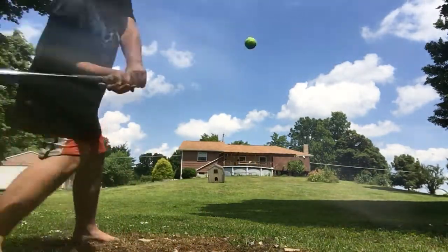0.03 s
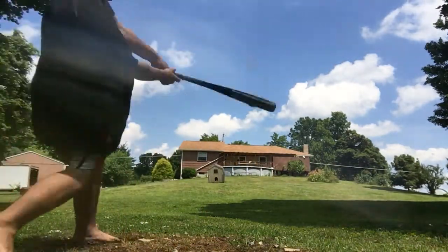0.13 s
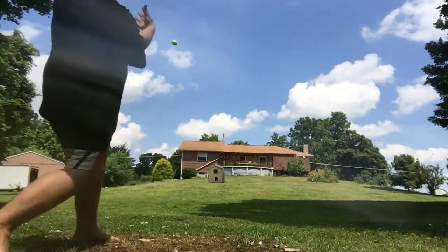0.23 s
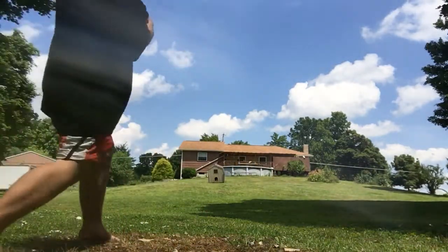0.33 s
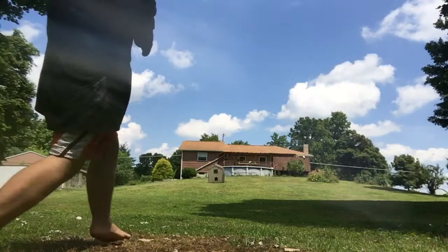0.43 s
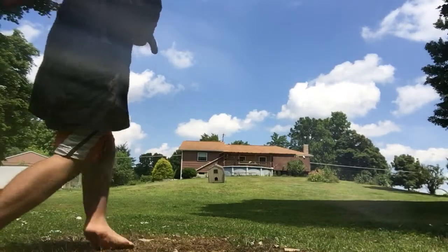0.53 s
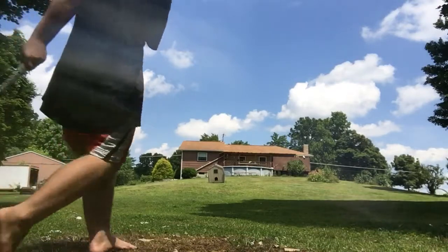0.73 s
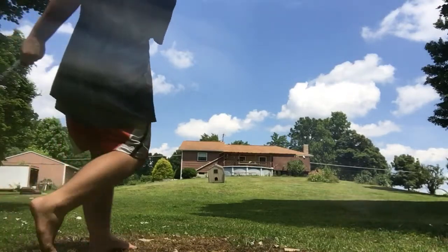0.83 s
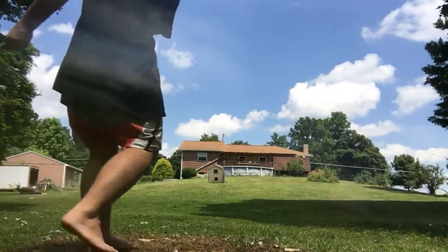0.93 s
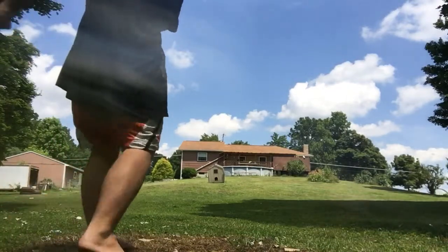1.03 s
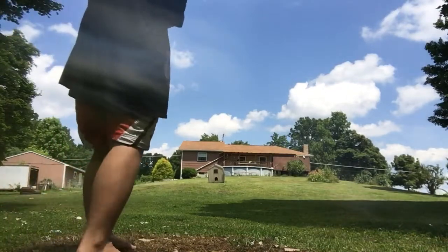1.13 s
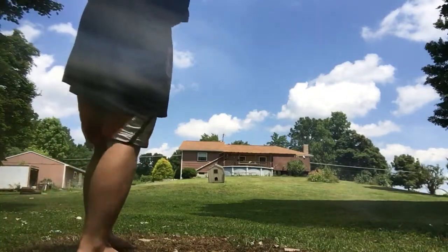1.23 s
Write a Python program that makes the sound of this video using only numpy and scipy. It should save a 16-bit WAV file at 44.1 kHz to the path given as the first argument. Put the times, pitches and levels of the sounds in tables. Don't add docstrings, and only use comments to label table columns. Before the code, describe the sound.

Close, ground-level outdoor pickup of a bat swing: slight rustle and whoosh, a sharp metallic crack with a very short ring and rubbery thump, dull slaps off walls and trees, quiet foot scuffs, and distant chirps.

```python
import sys
import numpy as np
from scipy import signal
from scipy.fft import rfft, irfft
from scipy.io import wavfile
from scipy.ndimage import uniform_filter1d

SR = 44100
rng = np.random.default_rng(int(sys.argv[2]) if len(sys.argv) > 2 else 0)


def generate_wav(signal):
    frames = np.transpose(np.atleast_2d(signal))
    scaled = np.clip(frames, -1, 1) * 32767
    pcm = np.round(scaled).astype(np.int16)
    wavfile.write(sys.argv[1], SR, pcm)


def voltage_ratio(level):
    return 10 ** (np.asarray(level, float) / 20)


N = 57330
T = np.arange(N) / SR
HIT_S = .23214
LEAD_IN_HZ = 1620


def noise():
    return rng.standard_normal(N)


def curve(table):
    return voltage_ratio(np.interp(T, *np.array(table).T))


def unit(x):
    return x / np.sqrt(np.mean(x ** 2))


def walk(rate):
    hold = int(SR / rate)
    stairs = np.repeat(rng.standard_normal(N // hold + 1), hold)
    slewed = uniform_filter1d(uniform_filter1d(stairs, hold), hold)
    return unit(slewed[:N])


def band(x, hz, width_hz):
    f = np.arange(N // 2 + 1) * SR / N
    bell = np.exp(-.5 * ((f - hz) / width_hz * 2) ** 2)
    return irfft(rfft(x) * bell, N)


def coloured(x, table, flicker_db, rate):
    f = np.arange(1, N // 2 + 2) * SR / N
    hz, db = np.array(table).T
    shaped = rfft(x) * voltage_ratio(np.interp(np.log(f), np.log(hz), db))
    octave = np.log2(f / 30)
    out = 0
    for k in range(11):
        share = np.sqrt(np.clip(1 - abs(octave - k), 0, 1))
        out = out + voltage_ratio(flicker_db * walk(rate)) * irfft(shaped * share, N)
    return unit(out)


def fade(start_s, t60):
    u = np.maximum(T - start_s, 0)
    return u, (T >= start_s) * np.exp(-np.log(1000) * u / t60)


def swell(start_s, length_s):
    return np.sqrt(np.sin(np.pi * np.clip((T - start_s) / length_s, 0, 1)).clip(0))


def ring(hz, db, t60, late_s=0):
    u, decay = fade(HIT_S + late_s, t60)
    return voltage_ratio(db) * decay * np.sin(2 * np.pi * hz * u)


def barrel():
    # (frequency [Hz], level [dB], t60 [s])
    barrel_modes = [(1830, -2, .009), (1960, -25, .06), (2277, -14, .016), (2900, -13, .006),
                    (3665, -15, .019), (4520, -24, .01), (5430, -18, .011), (6045, -9.5, .013),
                    (7176, -19, .02), (8300, -33, .011), (10000, -32, .013), (11570, -28, .012),
                    (14000, -20, .005)]
    ringing = -sum(ring(*mode) for mode in barrel_modes)
    crack = voltage_ratio(-14.5) * fade(HIT_S, .011)[1] * unit(band(noise(), 4170, 10000))
    return ringing + crack


def ball():
    # (frequency [Hz], level [dB], t60 [s], time after the hit [s])
    ball_modes = [(584, -19, 0.027, 0.0023), (1177, -20, .022, 0.0084), (1290, -15, .016, 0.00018),
                  (160, -17.5, .03, .003), (739, -37, 0.018, 0.0026), (1602, -23, .022, 0.004)]
    late_s, squash_s, contact_s, t60_s = .00125, .001, .004, .012
    thump_hz, thump_db, sag, sag_s = 268, -2.8, .4, .0022
    u = np.maximum(T - HIT_S - late_s, 0)
    squash = 1 - np.exp(-u / squash_s)
    release = np.exp(-np.log(1000) * np.maximum(u - contact_s, 0) / t60_s)
    turns = thump_hz * (u + sag * sag_s * (1 - np.exp(-u / sag_s)))
    thump = voltage_ratio(thump_db) * squash * release * np.sin(2 * np.pi * turns)
    return thump + sum(ring(*mode) for mode in ball_modes)


def lead_in_tone():
    u = np.minimum(T - HIT_S, 0)
    return voltage_ratio(-19) * np.exp(u / .0016) * np.sin(-2 * np.pi * LEAD_IN_HZ * u)


def swing():
    # (time [s], level [dB])
    air_speed = [
        (.12, -69),
        (.17, -55.5),
        (.195, -43),
        (.225, -39.5),
        (.255, -43),
        (.28, -58),
        (.315, -55.5),
        (.345, -81),
        (.37, -86),
    ]
    # (frequency [Hz], level [dB per Hz])
    whoosh_colour = [(30, -14), (65, -4), (140, -5.5), (250, -14), (450, -26.5), (1300, -27), (3000, -40.5),
                     (8000, -61.5)]
    whoosh = curve(air_speed) * coloured(noise(), whoosh_colour, 1.4, 40)
    lead_s = .018
    lead_in_band = voltage_ratio(-40) * swell(HIT_S - lead_s, lead_s) * unit(band(noise(), LEAD_IN_HZ, 300))
    return whoosh + lead_in_band


def puffs():
    # (start [s], length [s], frequency [Hz], level [dB])
    air_puffs = [
        (.165, .065, 64, -39),
        (.285, .055, 63, -48),
        (.48, .045, 195, -57),
        (.005, .045, 210, -66),
    ]
    cycles = np.cumsum(1 + .05 * walk(40)) / SR
    return sum(voltage_ratio(db) * swell(start_s, length_s) ** 2 * np.sin(2 * np.pi * hz * cycles)
               for start_s, length_s, hz, db in air_puffs)


def echoes(x):
    # (time after the hit [s], level [dB], rise [s], t60 [s])
    clouds = [
        (.004, -34.5, 0.0018, 0.015),
        (.032, -36, .014, .19),
        (0.077, -51, 0.024, 0.072),
        (0.101, -54.5, 0.029, 0.75),
        (.262, -54, 0.0086, 0.16),
    ]
    # (frequency [Hz], level [dB per Hz])
    cloud_colour = [(88, -33), (150, -3.5), (334, -4), (730, -19), (905, -7.5), (1420, -9), (2450, -10),
                    (7470, -19), (16000, -38.5)]
    # (time after the hit [s], level [dB])
    hard_faces = [
        (0.035, -34),
        (0.072, -48),
        (0.083, -39.5),
        (.12, -45.5),
        (.18, -47),
        (0.267, -50.5),
    ]
    shape = 0
    for late_s, db, rise_s, t60 in clouds:
        u, decay = fade(HIT_S + late_s, t60)
        shape = shape + voltage_ratio(db) * decay * (1 - np.exp(-u / rise_s))
    cloud = shape * coloured(noise(), cloud_colour, 2.3, 40)
    rung = voltage_ratio(-25.5) * signal.fftconvolve(x[int(HIT_S * SR):], shape * noise())[:N]
    dull = band(x, 300, 900)
    slaps = sum(voltage_ratio(db) * np.roll(dull, int(late_s * SR)) for late_s, db in hard_faces)
    return cloud + rung + slaps


def rustle():
    # (time [s], level [dB])
    movement = [(0, -72.5), (.04, -72), (.1, -74.5), (.15, -66.5), (.19, -58.5), (.23, -61), (.25, -86),
                (.33, -73.5), (.47, -67), (.55, -70.5), (.6, -61.5), (.636, -66.5), (.646, -79),
                (1.06, -88), (1.12, -79), (1.3, -82.5)]
    # (frequency [Hz], level [dB per Hz])
    rustle_colour = [(180, -33), (300, 1), (331, -5.5), (1190, -3), (2100, -6.5), (2440, -7), (4160, -8.5),
                     (10900, -22), (16000, -21)]
    grains = noise() * voltage_ratio(2.5 * walk(900))
    return curve(movement) * voltage_ratio(3.5) * coloured(grains, rustle_colour, 1.0, 38)


def scuffs():
    # (start [s], length [s], level [dB], centre [Hz], width [Hz])
    toe_scuffs = [
        (0.03, 0.032, -77, 11100, 12000),
        (0.177, .05, -71, 9000, 14000),
        (.59, .018, -65.5, 14970, 4000),
        (0.854, 0.063, -69, 7900, 18200),
        (0.914, 0.034, -73, 8070, 18100),
        (0.941, 0.0087, -75, 12870, 6000),
        (1.061, 0.043, -69.5, 6000, 20100),
        (1.065, 0.026, -66.5, 1410, 2500),
        (1.167, 0.00826, -82.5, 11020, 8000),
    ]
    out = 0
    for start_s, length_s, db, hz, width_hz in toe_scuffs:
        brush = swell(start_s - .004, length_s + .0074) ** 2
        out = out + voltage_ratio(db + 1.0) * brush * unit(band(noise(), hz, width_hz))
    return out


def birds():
    # (start [s], length [s], pitch [Hz], spread [Hz], level [dB])
    chirps = [
        (-.05, .24, 3520, 200, -73),
        (.98, .105, 3740, 420, -69),
        (.995, .08, 3990, 420, -70),
        (1.06, .16, 3800, 800, -74),
        (1.04, .06, 2900, 200, -78),
        (1.16, .12, 3000, 150, -80),
    ]
    flutter, throb = walk(900), walk(150)
    out = 0
    for start_s, length_s, hz, spread_hz, db in chirps:
        pitch = hz + spread_hz / 2.0 * np.roll(flutter, int(hz))
        tone = np.sin(2 * np.pi * np.cumsum(pitch) / SR)
        out = out + voltage_ratio(db + 2.0 * throb) * swell(start_s, length_s) * tone
    return out


def insect():
    return voltage_ratio(-85 + 3 * walk(30)) * unit(band(noise(), 5380, 220))


def garden():
    # (frequency [Hz], level [dB per Hz])
    garden_colour = [(25, -22), (60, -4), (125, -2), (200, -7.5), (400, -15), (1030, -20.5), (5400, -30),
                     (9000, -41.5)]
    # (frequency [Hz], width [Hz], level [dB])
    machinery = [(63, 21, -71), (125, 30, -78)]
    hum = sum(voltage_ratio(db) * unit(band(noise(), hz, width_hz)) for hz, width_hz, db in machinery)
    return voltage_ratio(-65.5) * coloured(noise(), garden_colour, 1.5, 4.8) + hum


def scene():
    blow = barrel() + ball()
    motion = lead_in_tone() + swing() + puffs() + rustle() + scuffs()
    rest = echoes(blow) + motion + birds() + insect() + garden()
    air_top = signal.ellip(8, .2, 60, 15750, fs=SR, output="sos")
    return (blow + signal.sosfilt(air_top, rest))[None]


def band_limit(x):
    return signal.sosfilt(signal.butter(12, 16960, fs=SR, output="sos"), x)


def record(dry):
    bass_cut = signal.butter(2, 55, "high", fs=SR, output="sos")
    mic = signal.sosfilt(bass_cut, dry)
    return band_limit(1.096 * np.tanh(mic / 1.028))


dry = scene()
out = record(dry)
generate_wav(out)
```